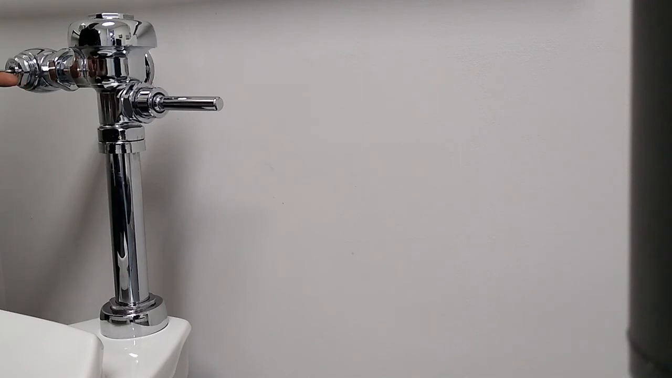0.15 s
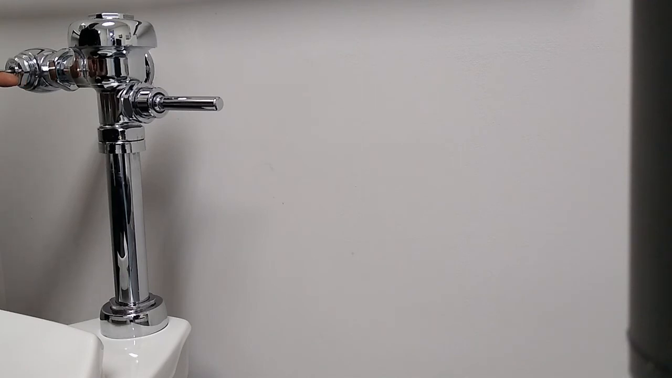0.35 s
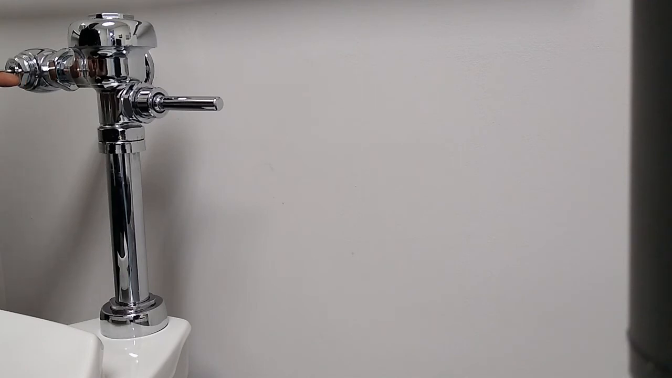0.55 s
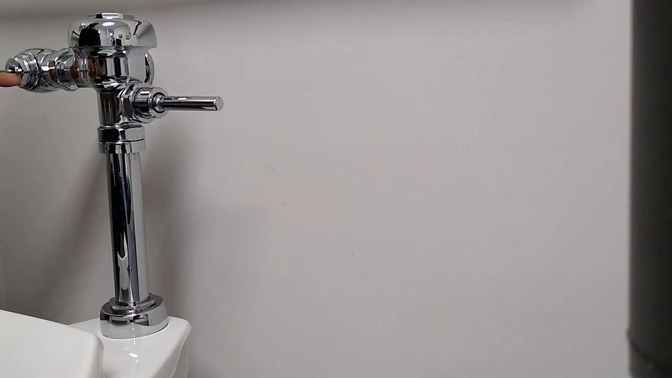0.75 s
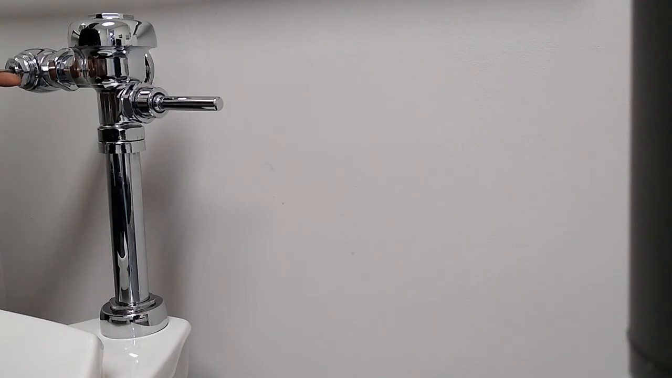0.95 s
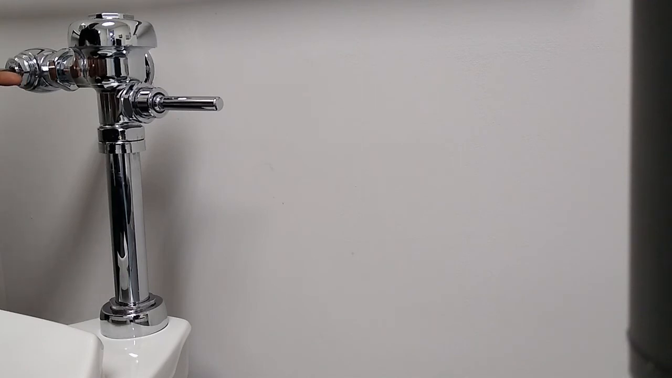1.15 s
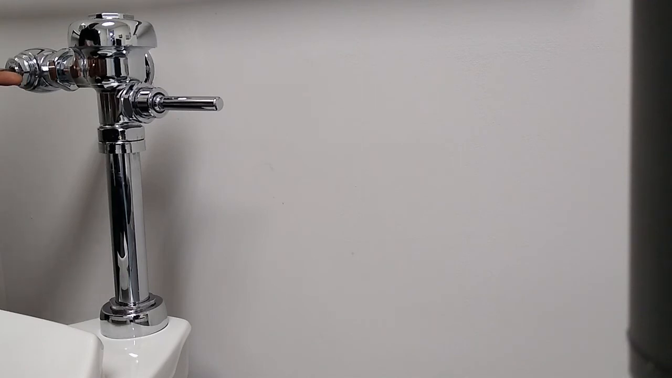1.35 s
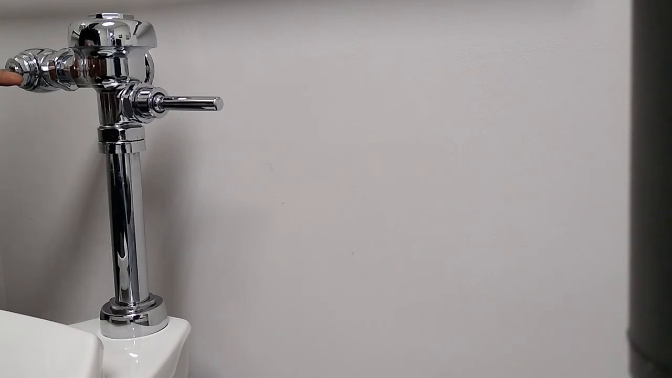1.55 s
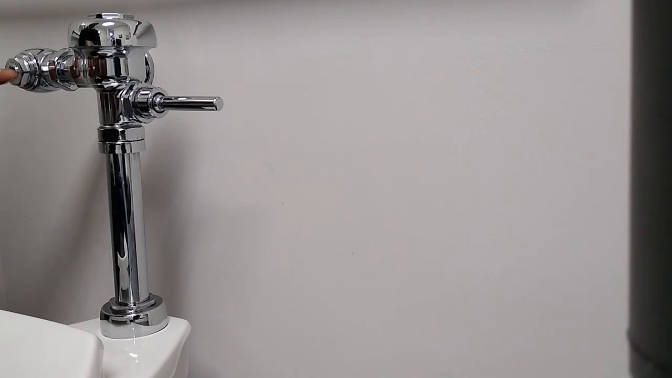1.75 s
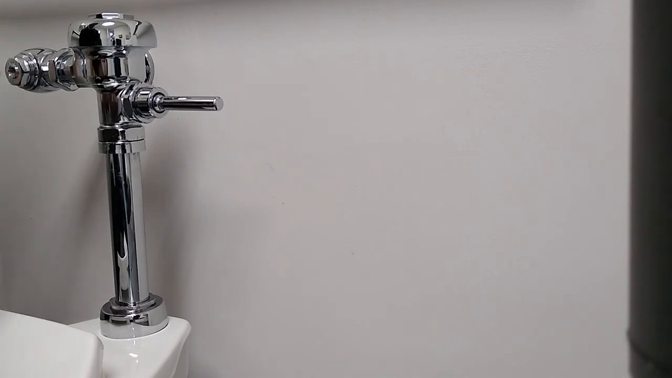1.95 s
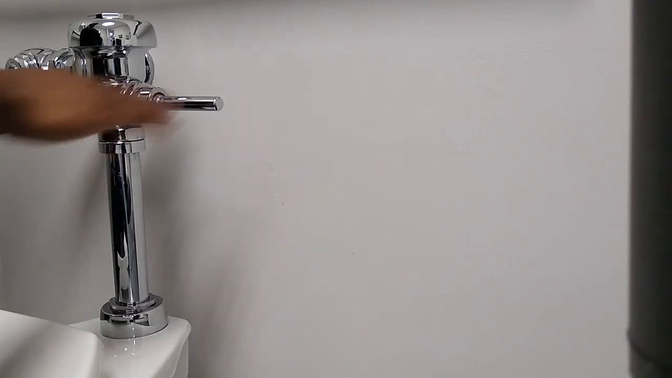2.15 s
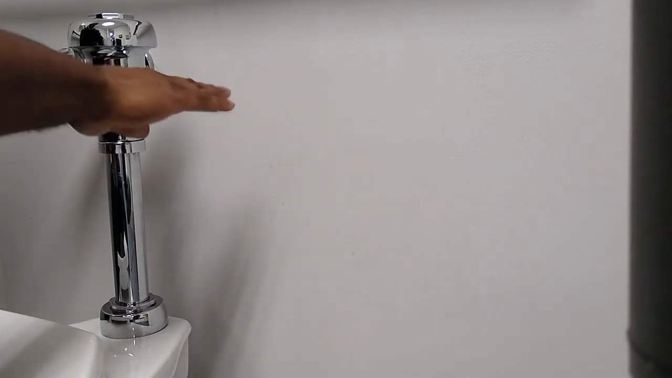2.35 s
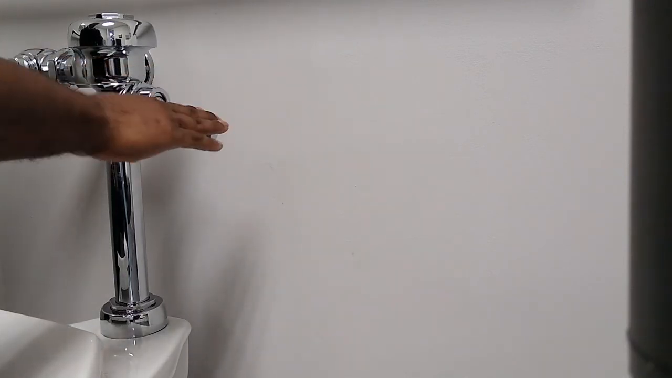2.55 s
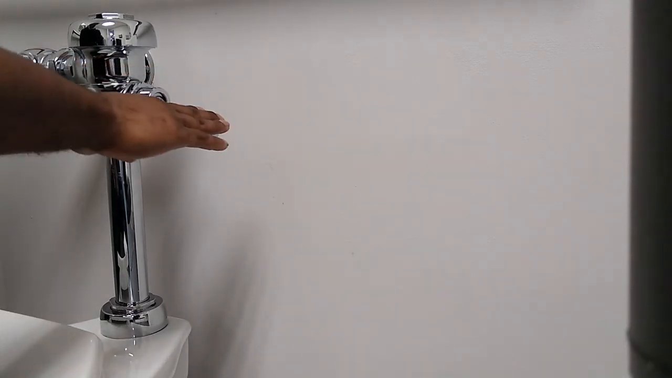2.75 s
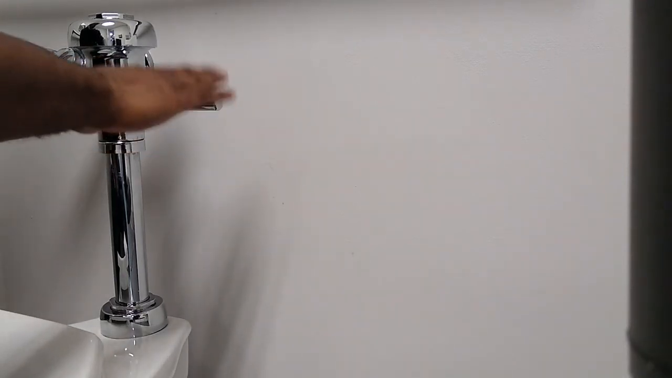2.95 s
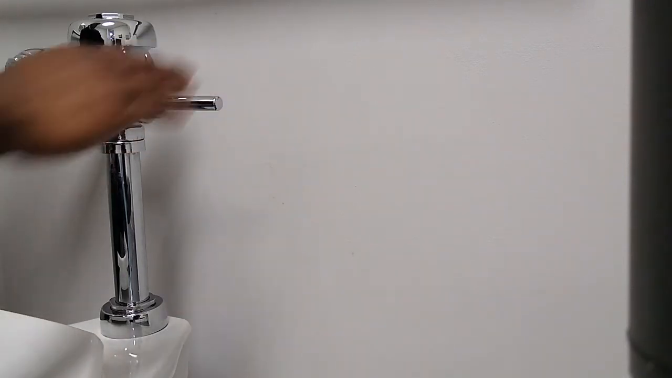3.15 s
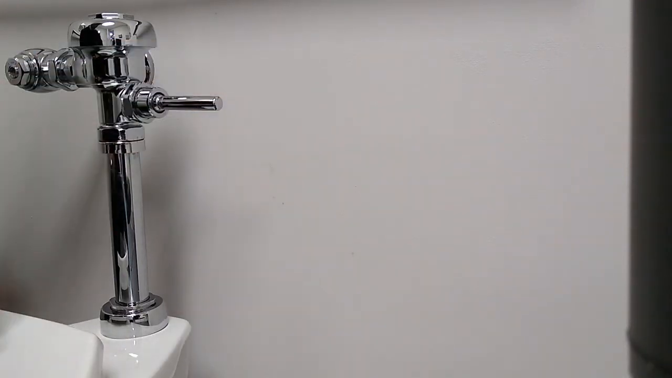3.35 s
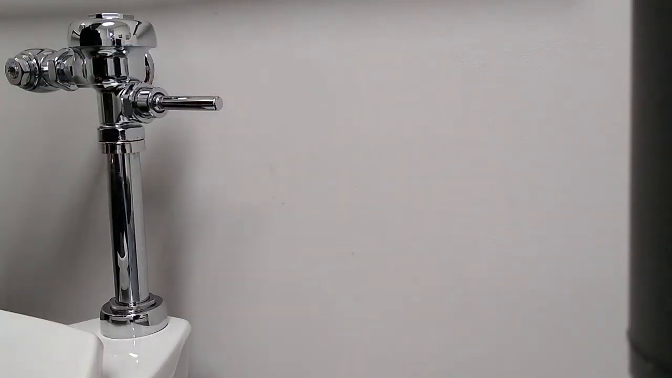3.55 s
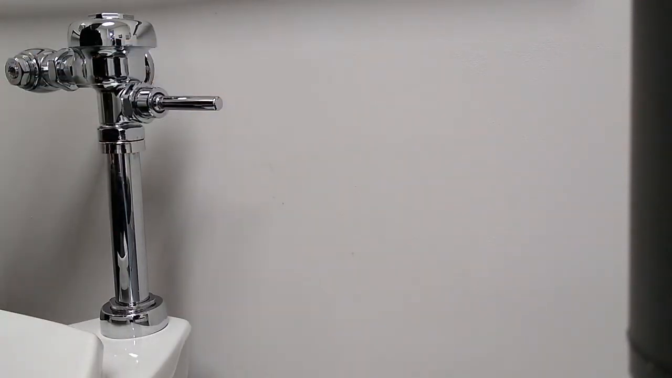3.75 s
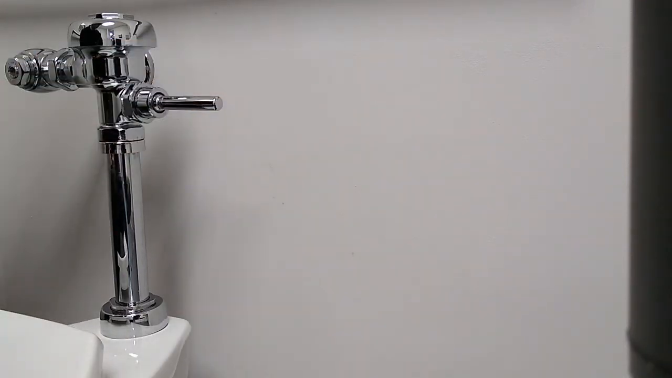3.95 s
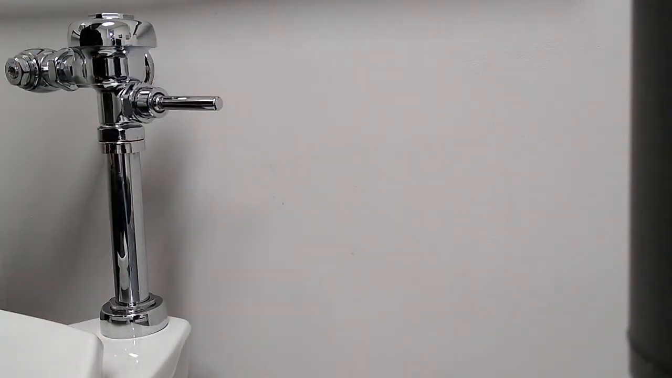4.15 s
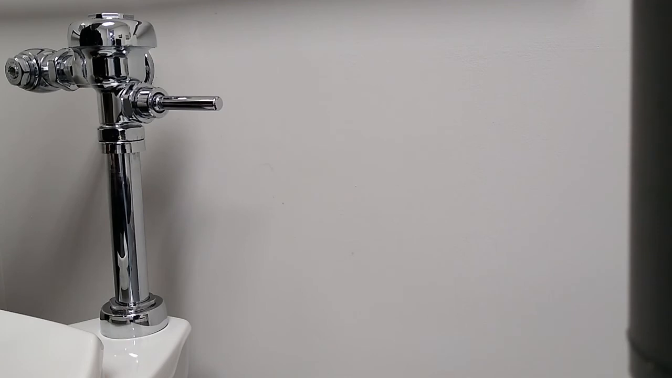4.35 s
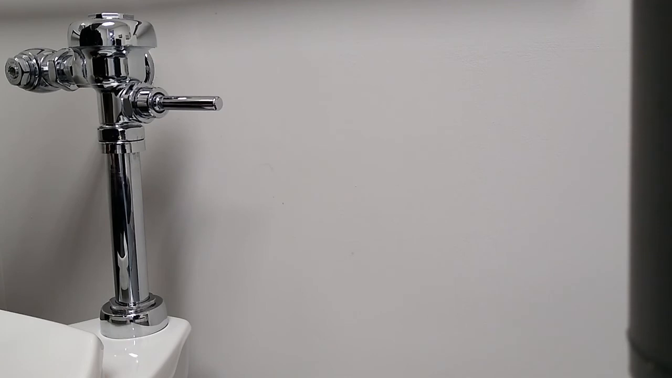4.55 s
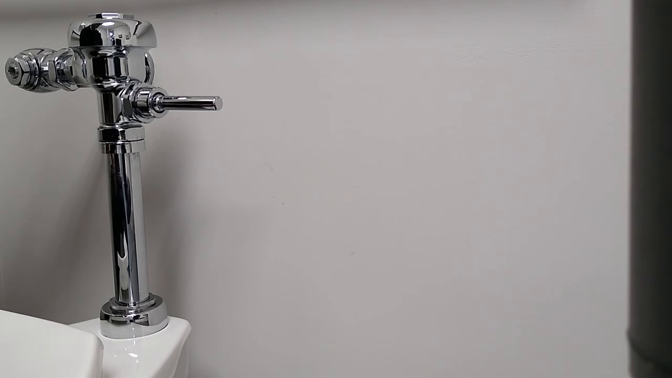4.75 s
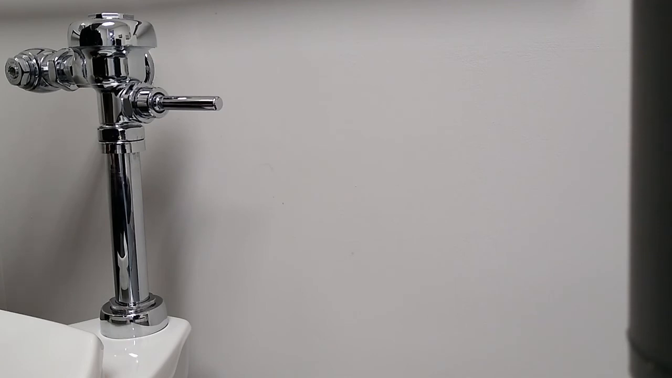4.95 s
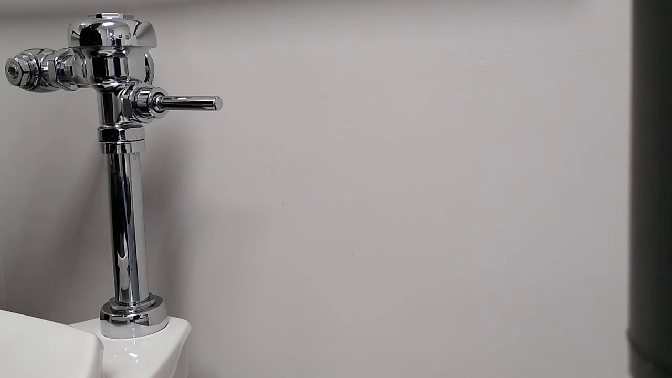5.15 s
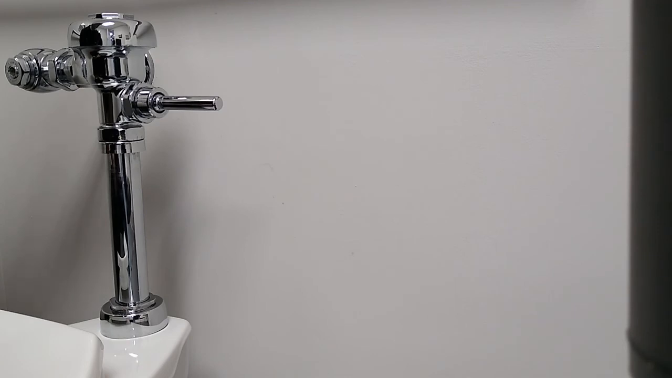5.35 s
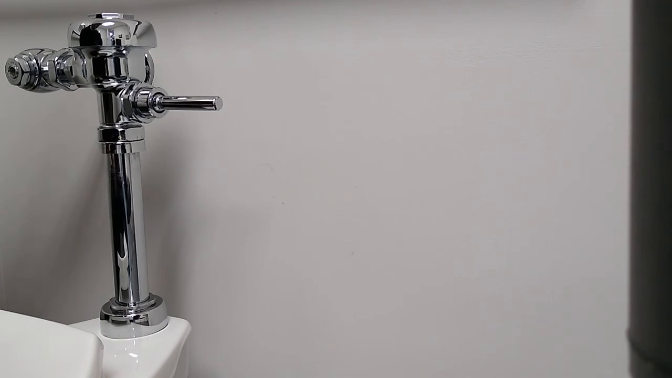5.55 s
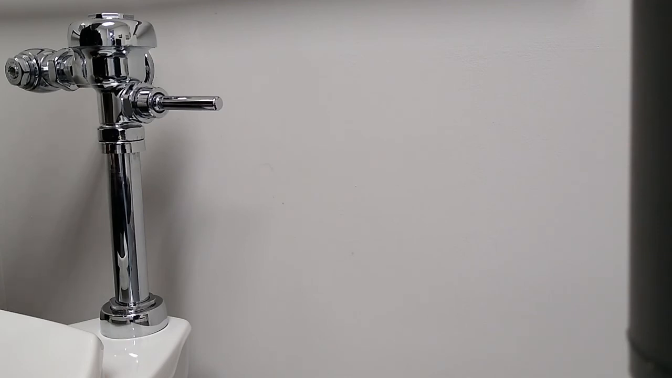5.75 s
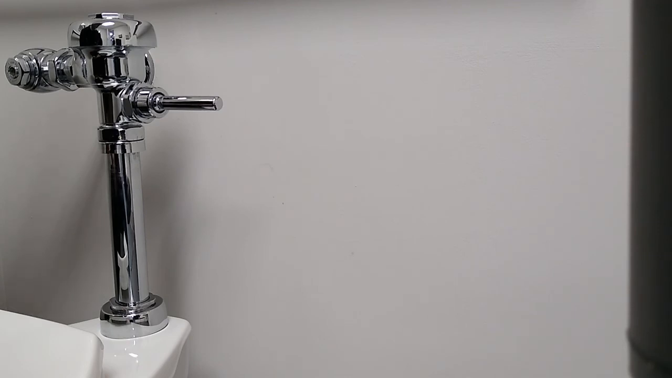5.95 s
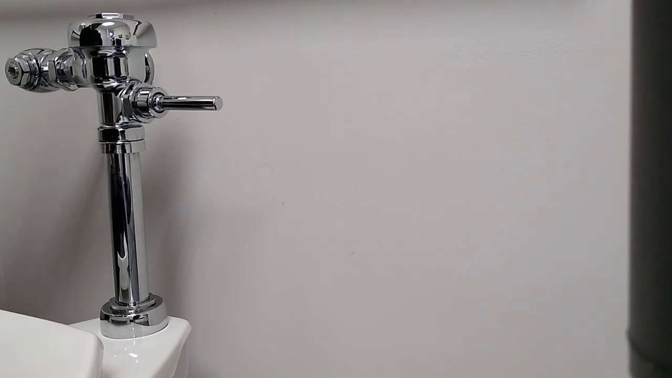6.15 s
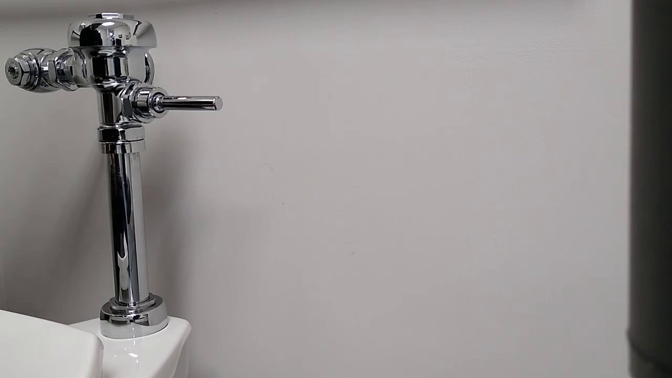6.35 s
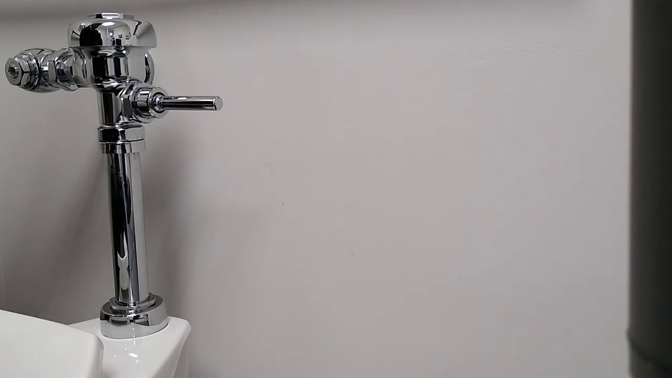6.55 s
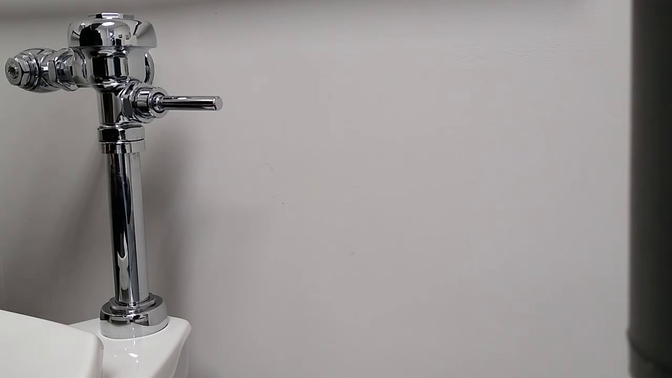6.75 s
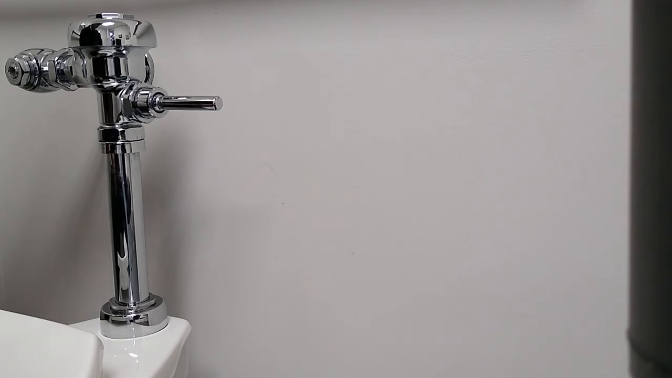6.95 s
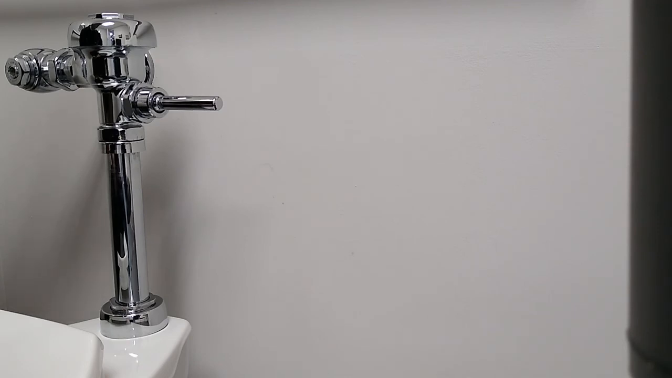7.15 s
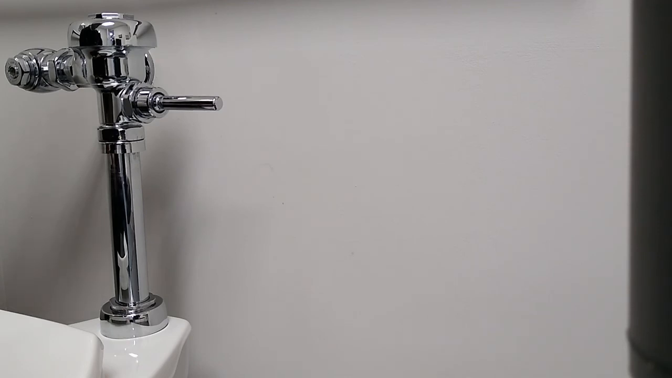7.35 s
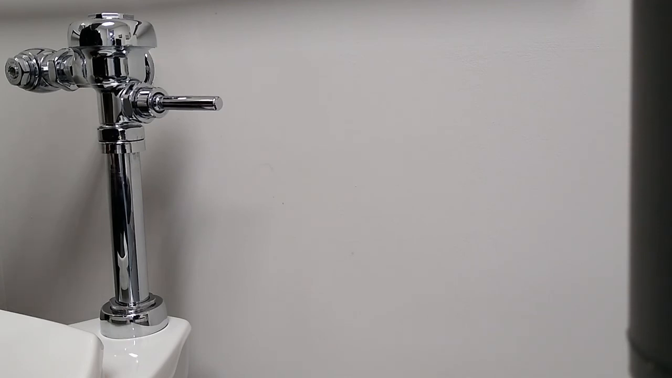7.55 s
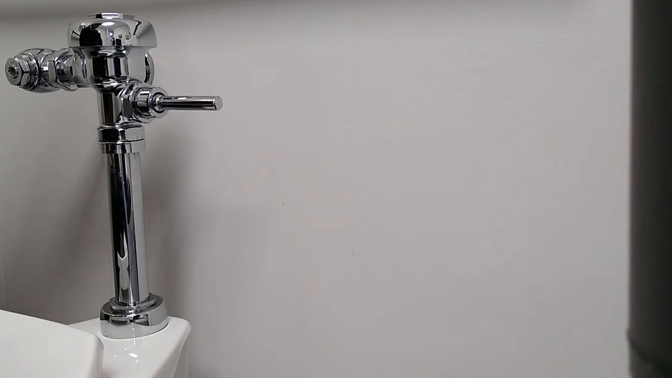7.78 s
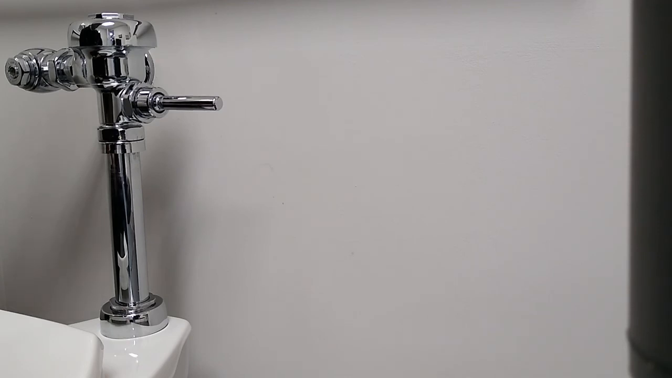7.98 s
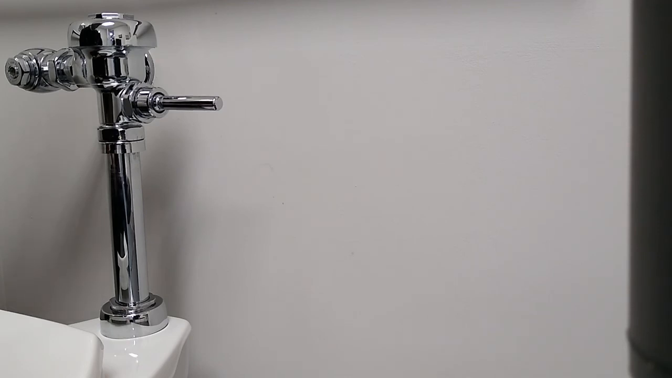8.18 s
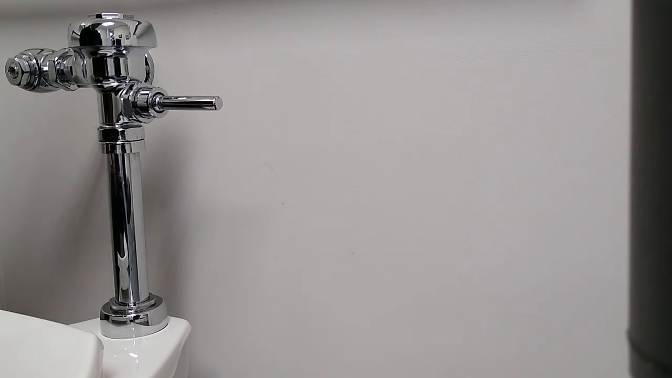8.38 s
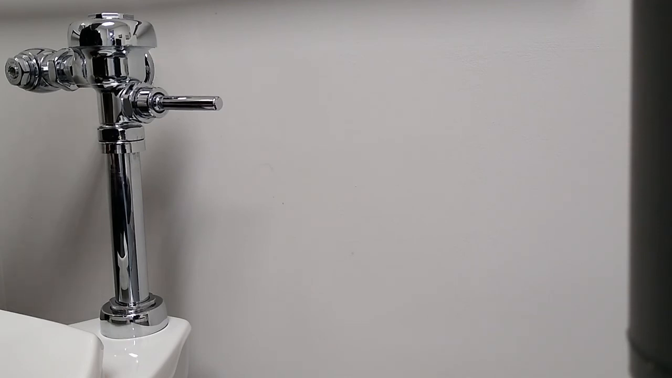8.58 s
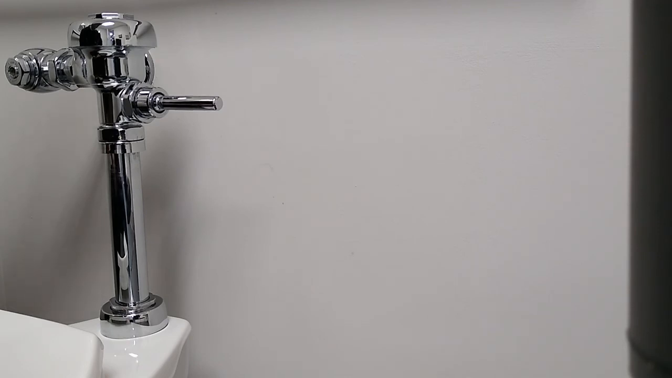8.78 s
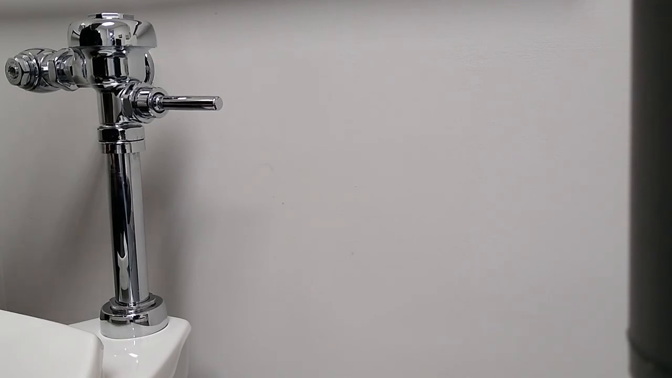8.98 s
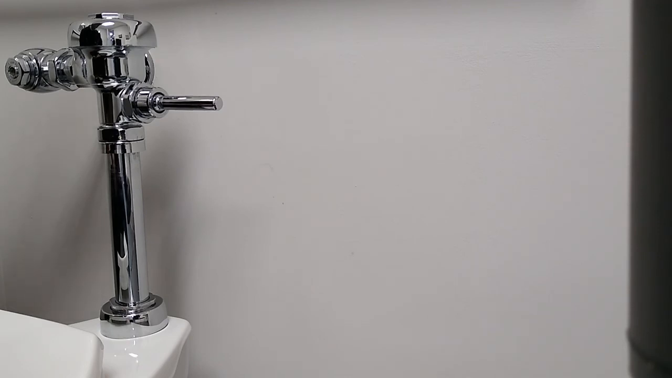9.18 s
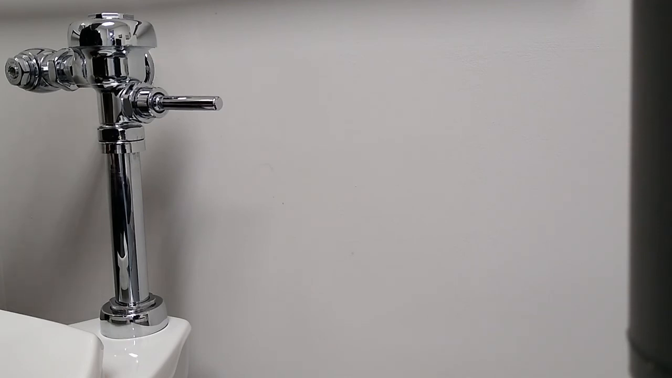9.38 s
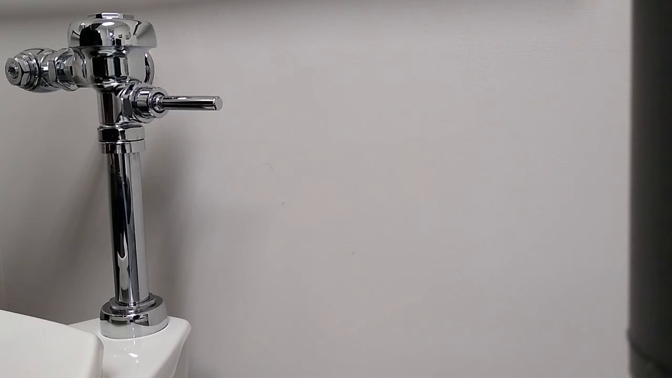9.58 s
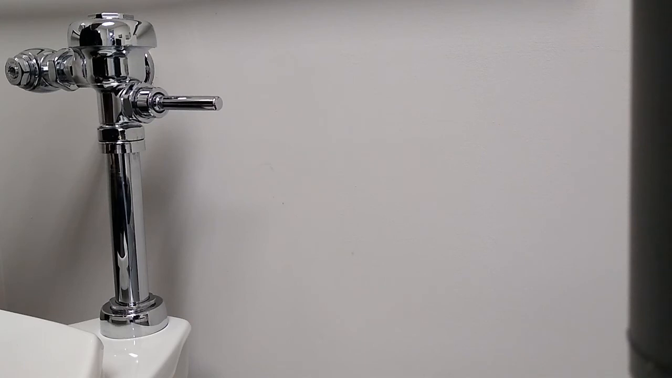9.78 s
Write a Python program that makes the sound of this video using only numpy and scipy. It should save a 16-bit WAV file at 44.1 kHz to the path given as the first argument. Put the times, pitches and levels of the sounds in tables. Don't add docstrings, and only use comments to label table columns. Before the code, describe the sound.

A thin valve hiss shuts off, near-silence with faint ticks, then a handle clunk, a rising gulp and a loud, spitting toilet flush to the end.

```python
import sys
import numpy as np
from scipy import signal
from scipy.fft import rfft, irfft, next_fast_len
from scipy.io import wavfile
from scipy.ndimage import uniform_filter1d, map_coordinates

SR = 44100
rng = np.random.default_rng(int(sys.argv[2]) if len(sys.argv) > 2 else 0)


def materialize(psi):
    bounded = np.clip(np.atleast_2d(psi).T, -1, 1)
    quanta = np.round(bounded * 32767).astype(np.int16)
    wavfile.write(sys.argv[1], SR, quanta)


def ratio_of_db(decibels):
    return 10 ** (np.asarray(decibels, float) / 20)


N = 433062

# pitch_hz, density_db (per Hz)
SPRAY = [(2940, -37.5), (5000, -8), (5380, -6), (6720, -6), (9470, -3.5), (11200, 0), (12700, -1),
         (14900, -6.5), (15900, -7.5)]
# pitch_hz, density_db (per Hz)
CHURN = [(650, -53), (1100, -16), (1290, -6.5), (1500, -3), (1640, -3), (2150, -0.5), (2940, 1), (6430, -6),
         (11500, -17), (14900, -16), (15900, -22)]
# time_s, pitch_hz
PIPE_HZ = [(2.6, 213.7), (3.05, 225.7), (3.5, 222.6), (4.3, 218.5), (6, 217.7), (7.5, 213.7), (9.82, 212.1)]


def unit(x):
    return x / np.sqrt(np.mean(x ** 2) + 1e-20)


def along(points, hz):
    f, v = np.transpose(points)
    return np.interp(np.log(hz + 1), np.log(f + 1), v)


def curves(rows, outside=None):
    s, *cols = np.transpose(rows)
    return [np.interp(np.arange(N) / SR, s, c, outside, outside) for c in cols]


def wobble(rate):
    knots = rng.standard_normal(int(N * rate / SR) + 4)
    return map_coordinates(knots, [np.arange(N) * rate / SR])


def bells(rows):
    out, s = np.zeros(N), np.arange(N) / SR
    for at, height, half in rows:
        near = slice(max(0, int((at - 3 * half) * SR)), int((at + 3 * half) * SR))
        out[near] += height * np.exp(-((s[near] - at) / half) ** 2)
    return out


def swells(rows, rest_db):
    power = bells([(s, ratio_of_db(2 * db), half) for s, db, half in rows])
    return np.sqrt(ratio_of_db(2 * rest_db) + power)


def filtered(x, response):
    m = next_fast_len(N + 8192)
    return irfft(rfft(x, m) * response(np.fft.rfftfreq(m, 1 / SR)), m)[..., :N]


def shaped(spectrum):
    return lambda hz: ratio_of_db(along(spectrum, hz))


def spread(pair, gain):
    # pitch_hz, likeness (0-1)
    alike = [(40, 1), (100, 0.9), (200, .7), (400, 0.62), (800, 0.17), (1500, 0.08), (3000, 0.055),
             (5500, 0.051), (8000, 0.54), (10000, 1), (15000, 0.57)]

    def turn(hz):
        return np.arccos(np.clip(along(alike, hz), -1, 1)) / 2

    mid, side = filtered(pair, lambda hz: gain(hz) * [np.cos(turn(hz)), np.sin(turn(hz))])
    return np.array([mid + side, mid - side]) / np.sqrt(np.mean(mid ** 2) + 1e-20)


def rush(gain, patchy_db, drops=0, spiky_db=0):
    z = signal.stft(rng.standard_normal((2, N)), nperseg=256)[2]
    field = uniform_filter1d(rng.standard_normal(z.shape[1:]), size=5, axis=0)
    field = uniform_filter1d(field, size=12, axis=1)
    patches = signal.istft(z * ratio_of_db(patchy_db * unit(field)), nperseg=256)[1][:, :N]
    size_db = np.minimum(spiky_db * rng.exponential(size=(2, N)), 9)
    landing = rng.random((2, N)) < 2000 / SR
    hits = landing * ratio_of_db(size_db) * rng.uniform(-1, 1, (2, N))
    return spread(unit(patches) + np.clip(drops, 0, .6) * unit(hits), gain)


def column(hz, width_hz):
    blow = filtered(rng.standard_normal((4, N)), lambda f: 1 / (1 + (f / width_hz) ** 2))
    phase = 2 * np.pi * np.cumsum(hz) / SR
    a, b = blow[:2] * np.cos(phase) + blow[2:] * np.sin(phase)
    return unit(np.array([a + 0.32 * b, a - 0.3 * b]))


def leak():
    # time_s, jet_db, throat_db
    closing = [
        (0.0, -33.5, -50.5),
        (0.32, -36, -50.5),
        (0.478, -42.5, -58.5),
        (0.544, -51.5, -55),
        (0.592, -49, -61),
        (0.622, -63.5, -77),
        (0.664, -65, -80),
        (0.71, -81.5, -90),
        (0.74, -77.5, -85),
    ]
    # pitch_hz, density_db (per Hz)
    jet_colour = [(1700, -52), (2060, -34), (3500, -11), (4290, -16), (4680, -5.5), (7020, -14), (8880, -9),
                  (9640, -10), (11000, -3), (12400, -3.5), (15900, -11)]
    # pitch_hz, density_db (per Hz)
    throat_colour = [(240, -49.5), (430, -25.5), (531, -16.5), (684, -20), (813, -11.5), (965, -27),
                     (1210, -6.5), (1270, -0.5), (1400, -9), (1520, -20), (1720, -33), (1960, -8),
                     (2280, -3), (2910, -3), (3790, -10), (4500, 1), (5850, -26.5), (9900, -120)]
    s = np.arange(N) / SR
    jet_db, throat_db = curves(closing)
    jet = rush(shaped(jet_colour), patchy_db=1.5, drops=0.41, spiky_db=-1.0)
    jet = ratio_of_db(jet_db + 0.34 * wobble(25)) * jet
    throat = ratio_of_db(throat_db) * rush(shaped(throat_colour), patchy_db=4.5)
    return (s < closing[-1][0]) * (jet + throat)


def building():
    # pitch_hz, density_db (per Hz)
    air_colour = [(100, -29.5), (150, -13), (240, -5), (420, -11.5), (740, -17.5), (1280, -26.5),
                  (1930, -26), (2860, -30.5), (4500, -33), (6700, -33.5), (16000, -35)]
    # pitch_hz, level_db
    hum_lines = [(134.6, -87), (236.9, -85), (296.1, -98.5), (344.5, -84.5), (387.6, -95), (732.1, -94.5),
                 (1906, -104)]
    # time_s, peak_db, half_length_s
    thump_rows = [(.55, -64, 0.069), (1.78, -58, 0.058), (2.1, -52.5, 0.092), (2.3, -62.5, 0.17),
                  (2.79, -46, 0.057), (2.9, -41, 0.13), (3.2, -47, 0.12), (3.61, -54, 0.078),
                  (3.94, -53, 0.051), (4.78, -55, 0.056), (5.8, -56, 0.37), (6.67, -55, 0.16),
                  (7, -54, 0.15), (7.5, -58, 0.22), (7.99, -54, 0.063), (8.39, -51, 0.083),
                  (8.64, -62, 0.077), (9.19, -54, 0.23), (9.55, -59, 0.073), (9.82, -50, 0.055)]
    # pitch_hz, density_db (per Hz)
    deep_colour = [(12, -33), (20, 8), (49, -13.5), (86, -0.5), (100, 0.5), (130, -26), (220, -120)]
    # pitch_hz, density_db (per Hz)
    thud_colour = [(53, -45.5), (90, -31.5), (124, 0), (156, -11), (190, -8.5), (250, -36), (420, -120)]
    spray_db = water()[0]
    thumps = swells(thump_rows, rest_db=-68)
    room_mode = column(np.full(N, 59.), width_hz=4)
    deep = .6 * rush(shaped(deep_colour), patchy_db=1.2) + .8 * room_mode
    hum = 0
    for hz, db in hum_lines:
        phase = 2 * np.pi * hz * np.arange(N) / SR + 0.62 * wobble(7.4)
        hum = hum + ratio_of_db(db + 5.5 + 1.7 * wobble(6.37)) * np.sin(phase)
    thud_gain = ratio_of_db(-12) * thumps + ratio_of_db(spray_db - 30 + 1.7 * wobble(3.5))
    thuds = thud_gain * rush(shaped(thud_colour), patchy_db=2.0)
    air = ratio_of_db(-72 - 5.5) * rush(shaped(air_colour), patchy_db=1.0)
    return thumps * deep + thuds + hum + air


def ticks():
    # start_s, peak_db, pitch_hz
    gurgles = [(.015, -55, 1290), (.055, -62, 520), (.13, -50, 1330), (.15, -60, 820), (.22, -66, 780),
               (0.324, -49.5, 1260), (.165, -57, 343), (.52, -54, 1290), (0.53, -55, 1700),
               (.553, -55, 560), (.581, -63, 354), (.652, -70, 2190), (.652, -73, 870), (.722, -60, 530),
               (3.878, -38, 560), (3.885, -36, 390), (3.931, -34, 300), (3.79, -41, 302), (2.678, -50, 590)]
    # start_s, peak_db, pitch_hz, width_hz
    fittings = [(.5, -44.5, 5840, 4970), (.727, -63, 12800, 1500), (.754, -62, 13000, 2500),
                (.756, -80, 6800, 300), (.822, -65, 6300, 1500), (.822, -73, 10400, 5000),
                (.948, -70, 14000, 2000), (.948, -78, 9500, 4010), (1.965, -65, 4700, 2600),
                (1.965, -80, 3000, 300), (1.965, -67, 4200, 350), (1.965, -65, 5100, 600),
                (1.965, -55, 11000, 8000), (1.965, -60, 7100, 1500), (2.33, -82, 10800, 900),
                (2.33, -80, 13200, 900), (2.4, -76, 13500, 1500), (2.43, -73, 12500, 3500),
                (2.572, -64.5, 12000, 7100), (1.968, -80, 1750, 500), (2.649, -64, 12000, 7000),
                (2.659, -66, 4100, 350), (2.657, -68, 2700, 1500), (2.683, -58, 900, 900),
                (2.688, -55, 1800, 2500), (2.7, -37, 470, 201)]
    # start_s, peak_db, pitch_hz, width_hz, t60_s
    slaps = [(1.608, -69, 1890, 90, 0.22), (1.615, -76, 2480, 110, .18), (1.08, -80, 7490, 500, .04),
             (1.08, -83, 6700, 400, .04), (1.152, -83, 6600, 400, .04), (1.226, -80, 7310, 400, .05),
             (1.745, -83.5, 6600, 400, .04), (1.852, -81, 8000, 600, .03), (.754, -54, 12900, 3950, .02),
             (.8216, -61, 7000, 4000, .02), (2.86, -28, 7000, 3500, 0.087), (2.6885, -47, 2800, 4400, .03),
             (5.86, -33.5, 1260, 590, 0.43), (2.719, -30.5, 9400, 13000, 0.048),
             (2.719, -33, 4100, 1100, 0.053), (2.721, -38.5, 2550, 1500, 0.12),
             (2.765, -47, 12900, 400, .6), (2.7855, -42, 12800, 400, .8), (2.97, -32, 11000, 1200, .1),
             (2.98, -33.5, 3760, 760, 0.21), (5.535, -31.5, 970, 110, 0.11), (5.538, -30, 1320, 98, 0.13),
             (3.8, -31, 850, 150, 0.17), (8.11, -14.5, 12000, 9070, 0.015),
             (8.116, -21, 12000, 11000, .012), (8.977, -30, 1510, 300, 0.083),
             (8.974, -35, 2120, 300, 0.06), (7.0, -32, 2150, 900, 0.18), (8.7, -35, 1400, 230, 0.11),
             (8.907, -25.5, 3200, 600, .06), (8.968, -29, 2900, 2200, 0.088), (8.747, -37, 545, 60, .15),
             (7.194, -28, 4000, 2500, 0.06), (7.35, -36, 2740, 450, 0.31), (7.55, -33, 2700, 700, 0.12)]
    events = [(s, db, hz, 0.096 * hz, 0.14) for s, db, hz in gurgles]
    events += [(*row, 0.2) for row in fittings]
    events += slaps
    out, t = np.zeros((2, N + SR)), np.arange(SR // 2) / SR
    f = np.fft.rfftfreq(len(t), 1 / SR)
    modes = ratio_of_db(1.2 * map_coordinates(rng.standard_normal(80), [f / 330]))
    for s, db, hz, width_hz, t60 in events:
        band = modes / (1 + (2 * (f - hz) / width_hz) ** 4)
        ring = irfft(rfft(rng.standard_normal((2, len(t)))) * band)
        rise = 1 - np.exp(-t * hz / 2.4)
        fade = ratio_of_db(-60 * t / t60) + 0.51 * ratio_of_db(-60 * t / 0.017)
        out[:, round(s * SR):][:, :len(t)] += ratio_of_db(db) * unit(ring) * rise * fade
    return out[:, :N]


def water():
    # time_s, flow_db, spray_over_flow_db, drain_over_flow_db
    flow_rows = [(2.64, -93, 16.5, -23.5), (2.712, -48.5, 3, 2), (2.73, -49.5, -3.5, 13),
                 (2.85, -44.5, 7, 12.5), (2.93, -42, 3.5, 9.5), (3.07, -36, 0, 3.5),
                 (3.15, -36.5, -1.5, 0.5), (3.35, -35.5, -2.5, -6.5), (3.78, -34.5, -8, 2),
                 (3.92, -34, 5, 9.5), (4.4, -30, 3, 0), (5, -30.5, 7.5, -1), (6, -31.5, 7, 0),
                 (6.6, -30.5, 8, -2.5), (7.1, -33, 8, -2), (7.9, -34, 9, 0), (8.7, -35, 10, 0.5),
                 (9.82, -35, 9.5, 3.5)]
    # time_s, gain_db, half_length_s
    surges = [(2.865, 12.5, 0.009), (2.982, 12, 0.022), (3.025, 5, .015), (3.09, -6.5, 0.025),
              (3.26, 6, 0.066), (4.21, 3, 0.0067), (4.32, -1, 0.022), (4.4, 1, 0.028), (4.96, -0.5, .06),
              (5.28, 1, .05), (5.36, -2, 0.05), (5.85, 0.5, 0.1), (5.74, 1, 0.088), (6.3, 0, 0.14),
              (6.6, -1, 0.065), (6.66, -3.5, 0.025), (6.7, 1.5, 0.022), (6.76, -3, 0.063), (6.94, 3, 0.014),
              (7.64, -2.5, 0.07), (7.9, -2.5, 0.044), (8.34, 3, 0.031), (8.72, -1, .04), (8.96, 0.5, 0.056),
              (9.04, -0.5, 0.027), (3.76, -5.5, .03), (3.87, -4.5, 0.024), (3.99, 2, .015),
              (4.04, 1, 0.015), (5.1, 1, 0.018), (5.415, -3, 0.0098), (6.08, 1.5, 0.027), (6.12, -1, .02),
              (6.368, 3, 0.0122), (6.85, 1.5, 0.0073), (7.09, 2.5, .01), (7.35, 2.5, 0.0121),
              (7.447, 3, 0.0083), (7.53, 1.5, 0.0073), (7.575, 4, 0.00824), (7.737, -0.5, 0.0087),
              (7.81, -7, 0.011), (7.95, 1, .01), (8.09, 1.5, 0.011), (8.15, 2, .01), (8.23, 1, 0.014),
              (8.37, -4.5, 0.026), (8.47, 1.5, 0.0092), (8.56, 1.5, 0.0099), (8.612, -6, 0.0089),
              (8.925, 0.5, .012), (9.49, 0, .01), (9.775, 1, .012)]
    flow_db, spray_db, drain_db = curves(flow_rows)
    flow_db = np.where(np.arange(N) / SR < flow_rows[0][0], -120, flow_db)
    surge_db = bells(surges)
    churn_db = flow_db + 0.55 * surge_db
    return flow_db + spray_db + surge_db, churn_db, flow_db, drain_db


def flush():
    # pitch_hz, width_hz, level_db
    stall_modes = [(1289, 42, 11), (1450, 12, 9.5), (1850, 20, 4.5), (2230, 26, 3.5), (2800, 56, 0),
                   (3140, 60, -3.5), (3392, 34, 7), (3860, 360, -3.5), (4340, 460, 0.5), (6050, 140, 0.5)]

    def stall(f):
        return 1 + 0.57 * sum(ratio_of_db(db) / (1 + (2 * (f - c) / w) ** 2) for c, w, db in stall_modes)

    spray_db, churn_db = water()[:2]
    surge_db = .3 * wobble(16) + .95 * wobble(45)
    spray = rush(shaped(SPRAY), patchy_db=1.7, drops=.45, spiky_db=3)
    churn = rush(lambda f: shaped(CHURN)(f) * stall(f), patchy_db=1.0, drops=.3, spiky_db=3)
    return ratio_of_db(spray_db - .6 + surge_db) * spray + ratio_of_db(churn_db - 0.37 + 0.58 * surge_db) * churn


def pipe():
    # time_s, peak_db, half_length_s
    swallows = [(2.8, -41.5, 0.021), (3.02, -38, 0.03), (3.24, -49, 0.09), (3.44, -38, 0.014),
                (3.55, -63, 0.028), (3.92, -43, 0.081), (4.8, -41, 0.22), (5.7, -41, 0.11),
                (6.08, -39, .05), (6.68, -40.5, 0.13), (7.06, -42, 0.084), (8.8, -45, 0.078),
                (9.15, -47, 0.11), (9.55, -51, 0.063)]
    # pitch_hz, density_db (per Hz)
    bowl_colour = [(250, -45), (430, -20), (485, -10.5), (516, -1), (531, 7.5), (548, 2), (605, -2),
                   (694, 5.5), (745, -3.5), (796, 5), (850, -3.5), (934, 2.5), (1130, -7), (1280, -1),
                   (1380, -15), (1600, -5), (2080, -38), (3520, -120)]
    # pitch_hz, density_db (per Hz)
    trap_colour = [(230, -22.5), (280, -8), (300, -2.5), (322, -9), (400, -20), (460, -12), (560, -36)]
    # time_s, gain_db
    trap_gains = [(2.7, 4), (3.3, -7.5), (3.7, -2.5), (3.9, 0), (4.3, 1.5), (7, -2), (8.5, -2)]
    flow_db, drain_db = water()[2:]
    hum_gain = swells(swallows, flow_db + drain_db - 12) * ratio_of_db(0.43 * wobble(7.1))
    hum = hum_gain * column(curves(PIPE_HZ)[0], width_hz=21.0)
    bowl_db = flow_db + 0.59 * drain_db - 8.5 + 1.5 * wobble(9)
    bowl = ratio_of_db(bowl_db) * rush(shaped(bowl_colour), patchy_db=1.5)
    trap_db = flow_db + 0.94 * drain_db - 15.5 + curves(trap_gains)[0] + 1.7 * wobble(7.3)
    trap = ratio_of_db(trap_db) * rush(shaped(trap_colour), patchy_db=3.5)
    return hum + trap + bowl + beads()


def gulp():
    # time_s, pitch_hz, level_db
    filling = [
        (2.74, 132, -41),
        (2.8, 137, -44),
        (2.86, 141, -44),
        (2.885, 145, -27.5),
        (2.93, 183, -39),
        (2.98, 233, -35),
        (3.02, 237, -45),
        (3.06, 231, -67),
    ]
    hz, level_db = curves(filling)
    inside = curves([(filling[0][0], 1), (filling[-1][0], 1)], 0)[0]
    return inside * ratio_of_db(level_db + 2.5) * np.sin(2 * np.pi * np.cumsum(hz) / SR)


def spits():
    # start_s, peak_db, dull_over_peak_db
    splats = [(2.7713, -34, -17), (2.835, -25, -21), (2.856, -9.5, -12.5), (2.9693, -14.5, -15),
              (3.086, -13, -11), (3.2372, -10.5, -27), (3.4155, -22.5, 1.5), (3.545, -17.5, -20),
              (3.7825, -23.5, -1.5), (3.8374, -45, -11.5), (3.8808, -22, 2), (3.9436, -7, -20),
              (4.099, -10, -10), (4.1927, -9, -5.5), (4.3133, -6.5, -11), (4.3796, -5, -12.5),
              (4.404, -14, -10.5), (5.426, -8, -10.5), (6.2574, -13, -21), (6.342, -9.5, -24.5),
              (6.8913, -4.5, -17), (7.1384, -4.5, -20), (7.324, -5.5, -30), (7.5857, -6.5, -20.5),
              (7.7924, -10, -10.5), (7.8252, -8.5, -13), (8.1068, -18, -25), (8.328, -21, -23.5),
              (8.6553, -7, -25.5), (9.1084, -10, -19), (9.4616, -6, -33)]
    t = np.arange(SR // 8) / SR
    rise = (1 - np.exp(-t / .0027)) ** 2
    shape = rise * (ratio_of_db(-60 * t / 0.082) + 0.1 * ratio_of_db(-60 * t / 0.44))
    bright, dull = np.zeros((2, N + len(t)))
    for s, db, dull_db in splats:
        bright[round(s * SR):][:len(t)] += ratio_of_db(db - 12.5) * shape
        dull[round(s * SR):][:len(t)] += ratio_of_db(db + dull_db - 6.0) * shape
    bright_burst = bright[:N] * rush(shaped(SPRAY), patchy_db=3, drops=.7, spiky_db=4)
    return bright_burst + dull[:N] * rush(shaped(CHURN), patchy_db=2.5)


def bubbles(count=900):
    when, pitch, size, side = rng.random((count, 4)).T
    t = np.arange(SR // 25) / SR
    hz = 1700 * 3.2 ** pitch[:, None]
    life = 22 / hz
    fade = np.sin(np.pi * np.clip(t / life, 0, 1)) ** 2
    notes = np.sin(2 * np.pi * hz * t * (1 + 0.13 * t / life)) * fade
    first_s = 2.9
    start = ((first_s + when * (N / SR - first_s)) * SR).astype(int)[:, None] + np.arange(len(t))
    level = notes * ratio_of_db(-3 * np.log(size + .04))[:, None]
    pair = []
    for weight in (side, 1 - side):
        placed = np.bincount(start.ravel(), (level * weight[:, None]).ravel(), N + len(t))
        pair.append(placed[:N])
    return ratio_of_db(water()[1] - 11) * unit(np.array(pair))


def beads():
    # peak_time_s, peak_db, fade_s
    kicks = [(3.766, -40, 0.07), (3.894, -27, 0.055), (4.011, -33, 0.035), (4.068, -44, 0.05),
             (4.173, -23, 0.055), (4.378, -40, 0.039), (4.43, -24, 0.034), (4.501, -28, 0.052),
             (4.593, -27, 0.05), (4.694, -26, 0.045), (4.751, -31, 0.06), (4.89, -35, 0.05),
             (5.104, -40, 0.038), (5.258, -32, 0.04), (5.355, -30, 0.08), (5.513, -37, 0.041),
             (5.582, -42, 0.057), (5.801, -30, 0.04), (5.866, -34, 0.043), (6.007, -27, 0.066),
             (6.188, -27, 0.034), (6.29, -29.5, 0.05), (6.362, -24, 0.023), (6.435, -25.5, 0.039),
             (6.54, -29, 0.03), (6.598, -40, 0.055), (6.661, -41, 0.05), (6.746, -29, 0.048),
             (6.813, -33, 0.035), (6.872, -45, 0.05), (6.934, -35, 0.066), (6.994, -32, 0.05),
             (7.044, -32, 0.054), (7.131, -23, 0.031), (7.294, -21, 0.025), (7.379, -33, 0.034),
             (7.478, -24.5, 0.046), (7.598, -34, 0.031), (7.679, -43, 0.042), (7.733, -28, 0.044),
             (7.908, -29, 0.068), (7.981, -30, 0.04), (8.06, -35, 0.055), (8.185, -35.5, 0.047),
             (8.288, -34, 0.055), (8.369, -30, 0.057), (8.453, -27, 0.039), (8.556, -33, 0.04),
             (8.622, -32, 0.04), (8.707, -40, 0.075), (8.924, -29, 0.07), (9.085, -28.5, 0.1),
             (9.207, -33, 0.069), (9.333, -30, 0.04), (9.424, -33, 0.05), (9.785, -29, 0.05)]
    rise_s = 0.011
    power, t = np.zeros(N + SR), np.arange(SR // 3) / SR
    rise = np.sin(np.pi / 2 * np.clip(t / (2 * rise_s), 0, 1)) ** 2
    for s, db, fade_s in kicks:
        shape = rise * np.exp(-(t / fade_s) ** 2)
        power[round((s - rise_s) * SR):][:len(t)] += (ratio_of_db(db - 1.5) * shape) ** 2
    hz = curves(PIPE_HZ)[0] + 3.49 * wobble(14)
    phase = 2 * np.pi * np.cumsum(hz) / SR
    apart = 0.34 * np.array([[1], [-1]]) * wobble(4.1)
    return np.sqrt(power[:N]) * np.sin(phase + apart)


def tiles(x, wet_db):
    t = np.arange(SR // 5) / SR
    tail = rng.standard_normal(len(t)) * ratio_of_db(-60 * t / 0.14) * (t > .001)
    wet = signal.fftconvolve(x, tail[None] / np.linalg.norm(tail), axes=1)[:, :N]
    colour = lambda f: f ** 2 / (f ** 2 + 400 ** 2) / np.sqrt(1 + (f / 4000) ** 2)
    return x + ratio_of_db(wet_db) * filtered(wet, colour)


def scene():
    # pitch_hz, width_hz, depth (0-1)
    null_rows = [(2770, 90, .25), (3200, 160, 0.42), (3460, 52, .25), (4140, 95, 0.4), (4700, 170, 0.34),
                 (5780, 87, .2), (6380, 110, 0.4)]

    def nulls(f):
        return 1 - sum(np.clip(d, 0, .8) / (1 + (2 * (f - c) / w) ** 2) for c, w, d in null_rows)

    wash = ratio_of_db(0.24) * filtered(tiles(leak() + flush() + spits(), wet_db=-17), nulls)
    small = tiles(ticks(), wet_db=3.0) + tiles(bubbles(), wet_db=-3.0)
    return wash + small + pipe() + gulp() + building()


def top_cut(x):
    return signal.sosfilt(signal.butter(12, 15550, fs=SR, output="sos"), x)


def record(dry):
    # pitch_hz, left_over_right_db
    lean = [(60, -1.2), (99, -1), (160, 5), (270, -3.5), (450, 2.5), (740, -0.5), (1220, -2), (2010, -4.5),
            (3330, 0.5), (5500, 2), (9080, 5), (15000, 7.5)]
    lag_s = 16 / 44100

    def early(hz):
        below_treble = np.clip((7000 - hz) / 1500, 0, 1)
        return np.exp(1j * np.pi * hz * lag_s * below_treble * np.array([[1], [-1]]))

    def port(hz):
        tilt = ratio_of_db(along(lean, hz) * np.array([[.35], [-.65]]))
        return tilt * early(hz) / (1 + (hz / 15900) ** 60)

    return top_cut(filtered(dry, port))


dry = scene()
out = record(dry)
materialize(out)
```